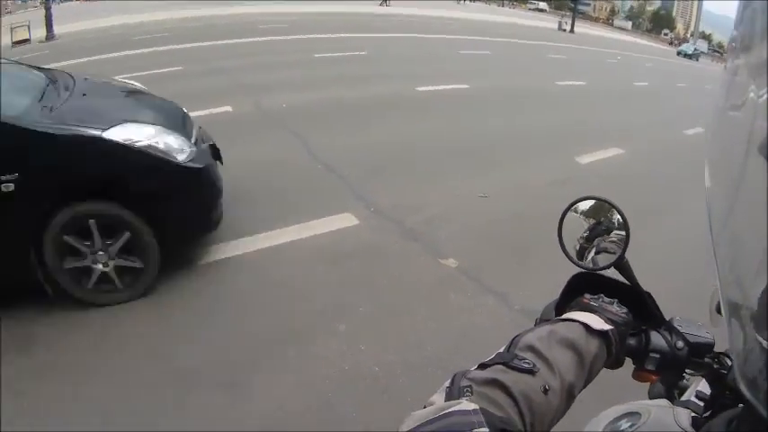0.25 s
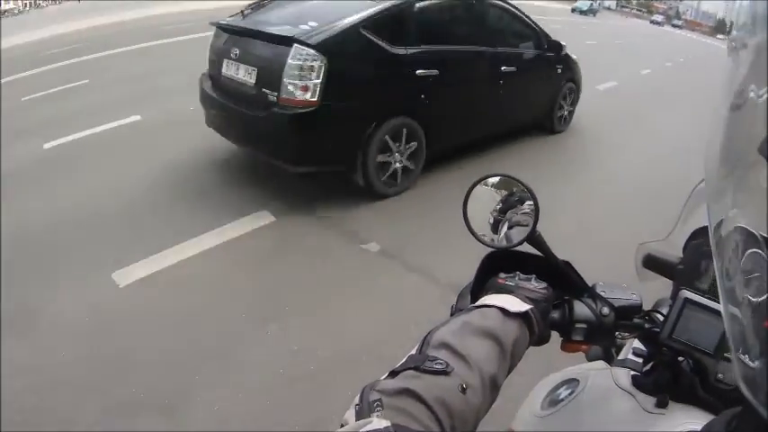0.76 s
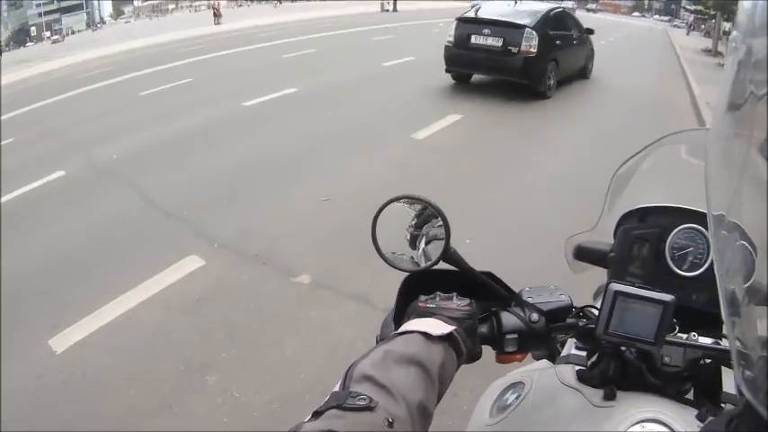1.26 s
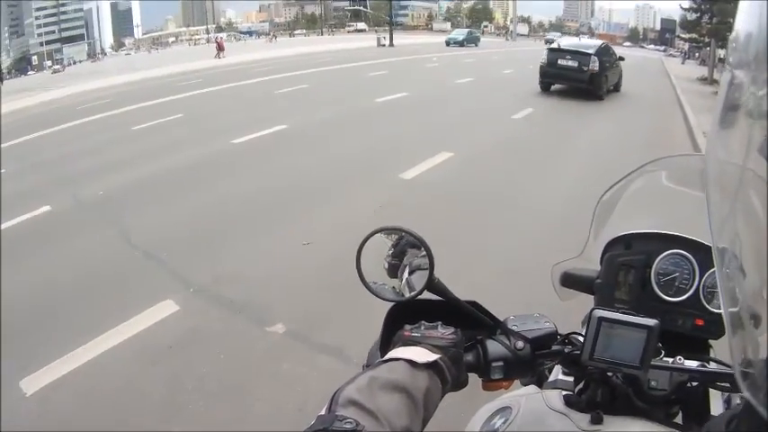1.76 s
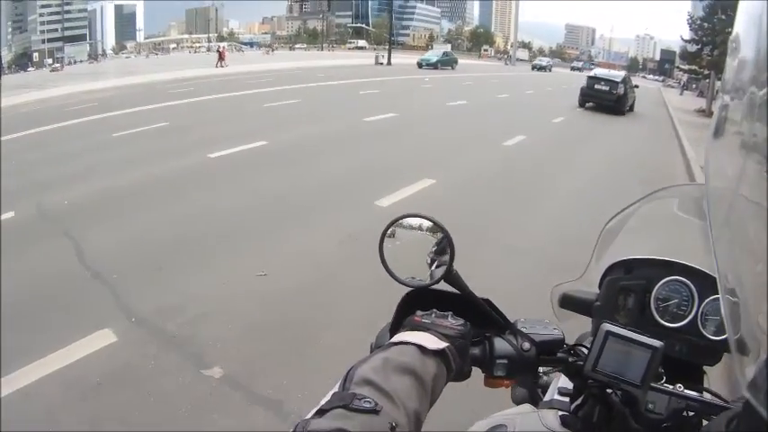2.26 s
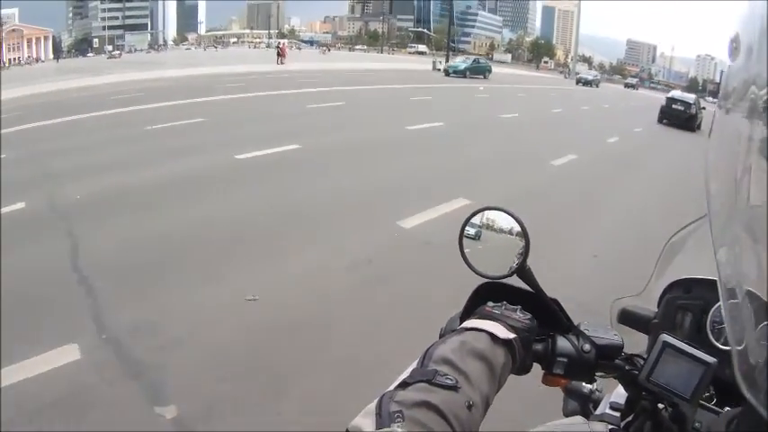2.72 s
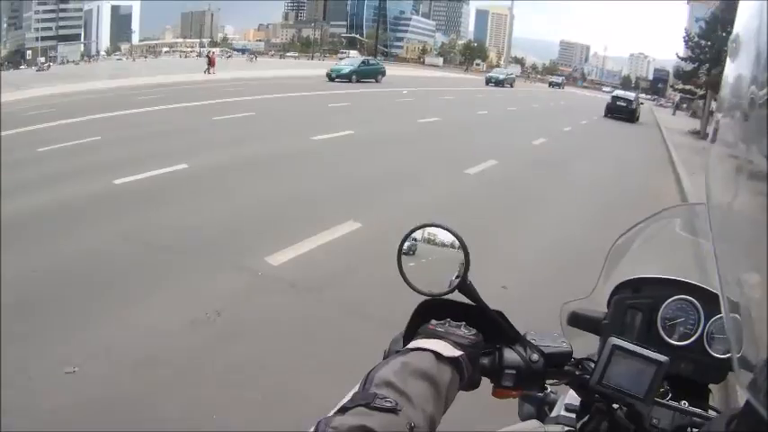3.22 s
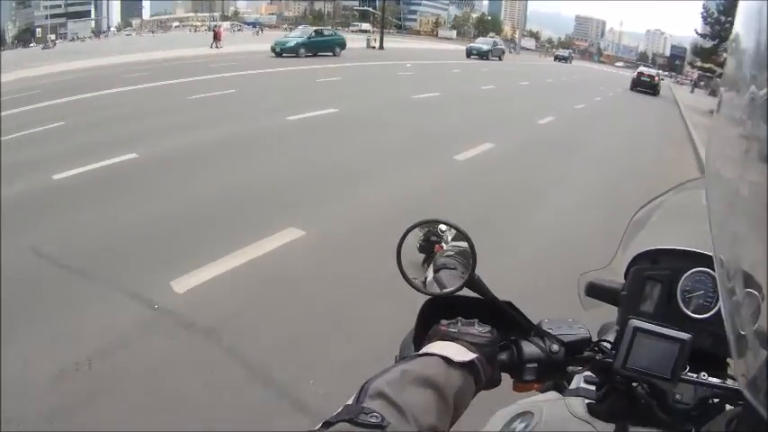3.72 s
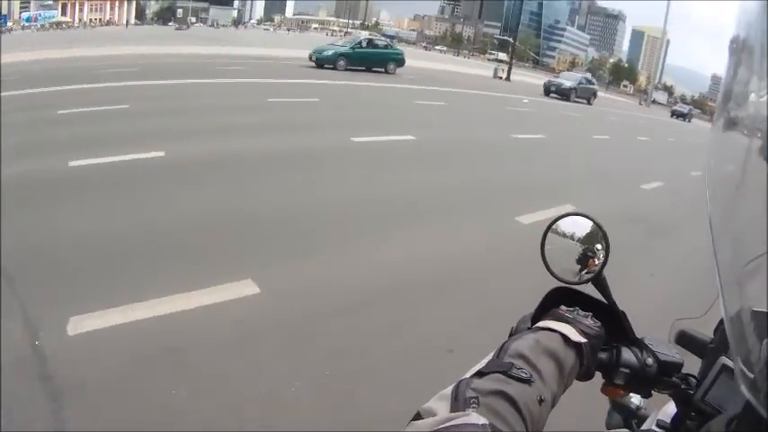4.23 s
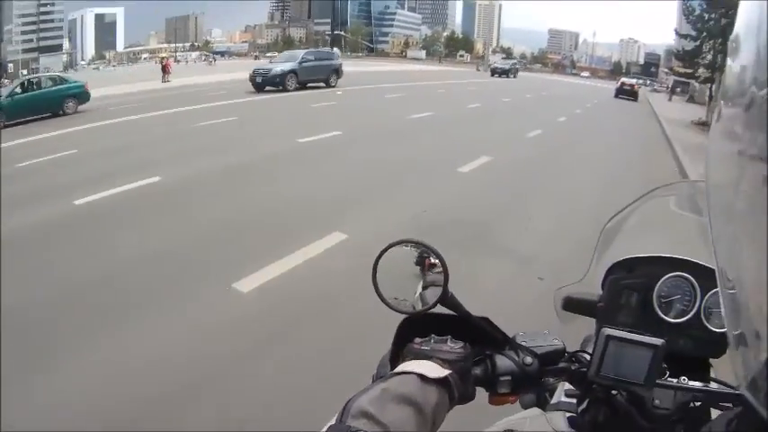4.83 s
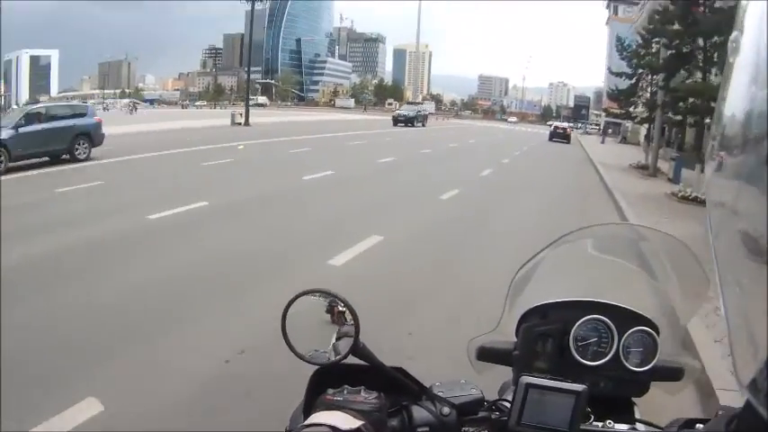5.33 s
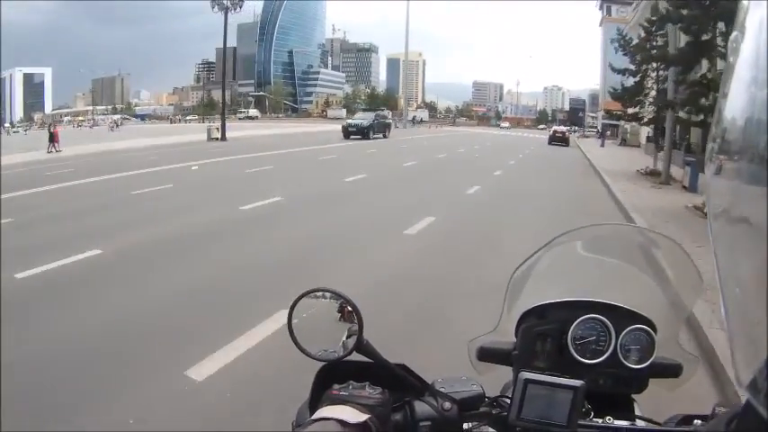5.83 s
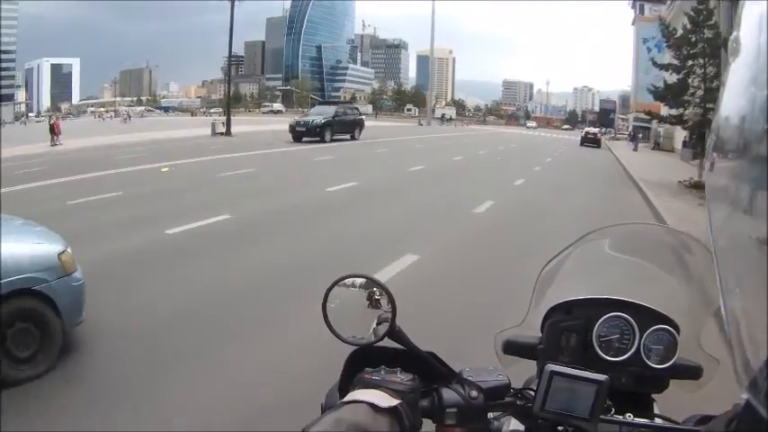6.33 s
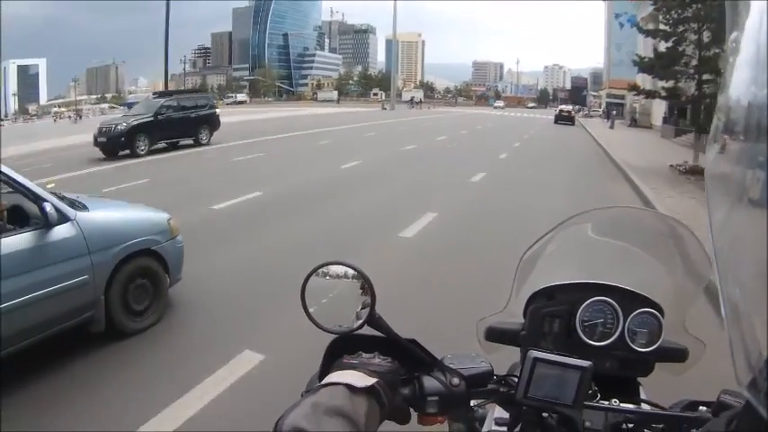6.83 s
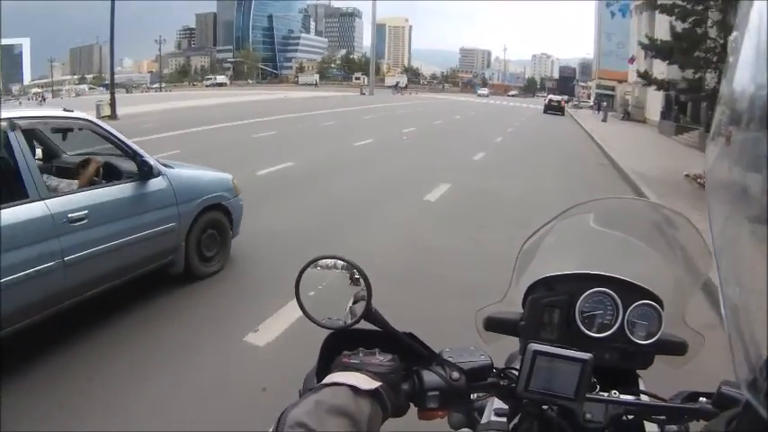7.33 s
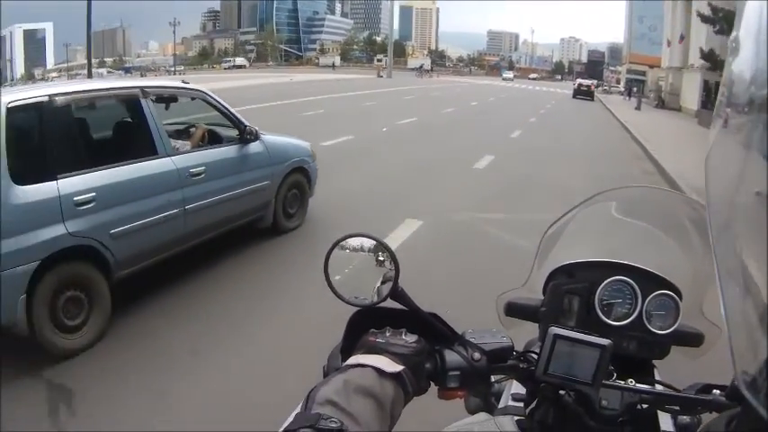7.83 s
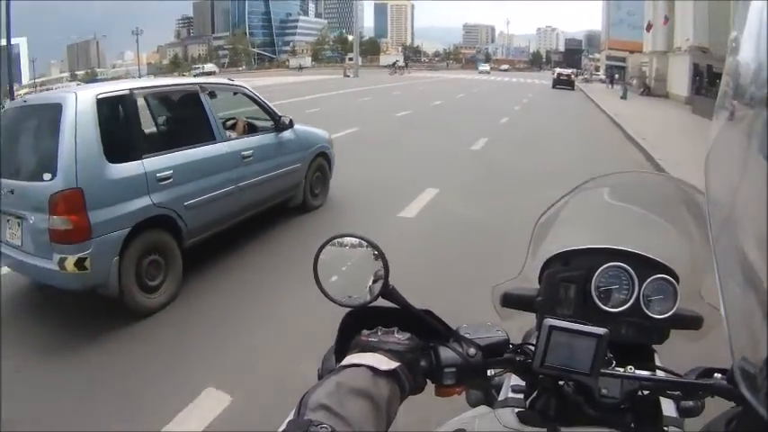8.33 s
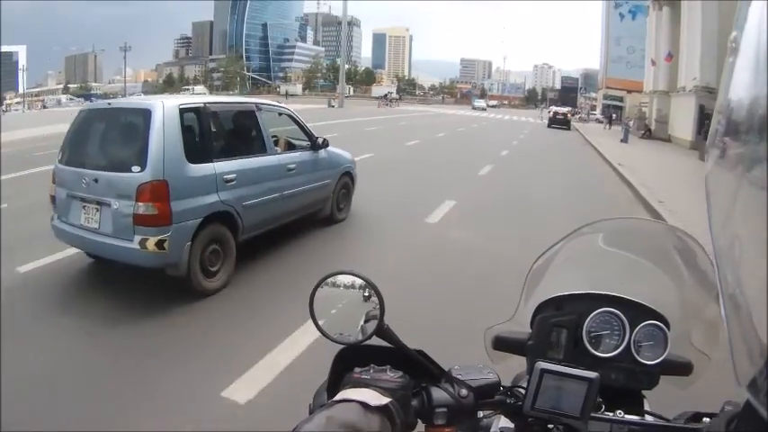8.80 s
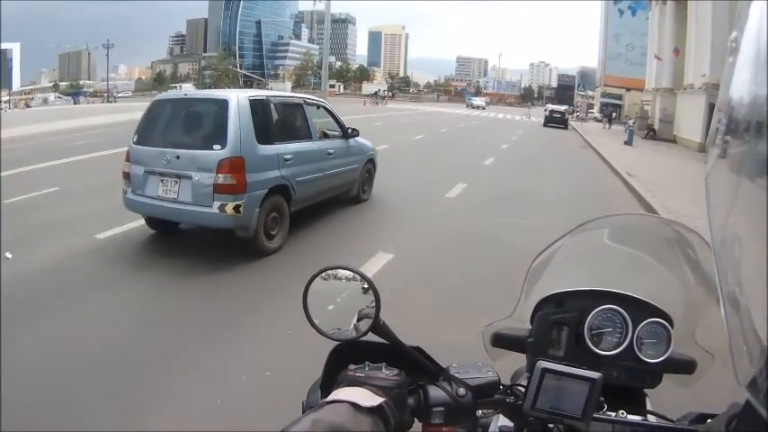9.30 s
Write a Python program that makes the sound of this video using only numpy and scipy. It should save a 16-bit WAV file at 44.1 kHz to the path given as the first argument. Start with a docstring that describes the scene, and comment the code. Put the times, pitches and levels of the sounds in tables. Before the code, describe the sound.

A single-cylinder motorcycle heard from the rider's helmet on an open city street. The low, uneven thump dips, picks up and settles to a steady chug with light mechanical ticking, while cars pass with tyre roar. It then revs up, growing throaty with intake hiss, until the throttle shuts and the engine drops back. A car hums alongside, then wind gusts batter the microphone.

```python
"""The thump of a single-cylinder four-stroke motorcycle, heard from the rider's helmet on a wide city road.
Each firing rings the exhaust pipe, the piston knocks in the crankcase and the valve gear ticks in the head.
The engine pulls up, air hissing at the intake, then the throttle shuts. Shaped noise makes the tyres, which
roar and hiss as cars go by; a car engine hums alongside late on. Wind rumbles at the microphone, and short
packets of filtered noise make its buffets, which crowd into the gusts towards the end."""
import sys
import numpy as np
from scipy import signal
from scipy.fft import rfft, irfft
from scipy.io import wavfile
from scipy.ndimage import uniform_filter1d

SR = 44100
rng = np.random.default_rng(int(sys.argv[2]) if len(sys.argv) > 2 else 0)


def int16_out(signal):
    """Quantize to a 16-bit WAV file."""
    q = np.round(np.clip(np.atleast_2d(signal).T, -1, 1) * 32767)
    wavfile.write(sys.argv[1], SR, q.astype(np.int16))


N = 421596

# engine speed, one firing per engine cycle: start_s, firing_rate_hz
FIRING_RATE = [(0.0, 17.407), (0.058, 16.089), (0.77, 23.68), (1.88, 19.956), (2.427, 19.441),
               (3.322, 20.793), (3.756, 21.894), (4.446, 19.562), (5.022, 22.048), (5.175, 21.233),
               (6.327, 26.431), (7.199, 31.146), (7.43, 31.249), (7.56, 26.5), (7.75, 23.7), (9.56, 23.2)]
# cars going by: nearest_s, fade_s (roar falls 3 dB in this time; sign ignored), roar_db, hiss_db,
# tread_air_db, tread_air_pitch_hz
PASSES = [(.1, 0.84, -64.5, -81, -72.5, 1470), (.48, -0.03, -75, -74.5, -74.5, 2090),
          (4.95, 0.73, -68.5, -86, -79, 1660), (5.38, 0.45, -62, -77.5, -69.5, 1010),
          (6.6, 0.47, -63, -86, -82, 1080), (7.45, 0.65, -65, -94, -81, 1600),
          (8.1, .5, -78, -82, -79, 1690)]


def undb(db):
    """Decibels to gain."""
    return 10 ** (np.asarray(db) / 20)


def curve(rows):
    """Rows of (s, value), joined by straight lines in time."""
    rows = np.array(rows)
    return np.interp(np.arange(N) / SR, rows[:, 0], rows[:, 1])


def swell(start, length, rise, fall):
    """Rise before the start, hold for the length and fall, between 0 and 1; times in seconds."""
    corners = [start - rise, start, start + length, start + length + fall]
    return np.interp(np.arange(N) / SR, corners, [0, 1, 1, 0])


def unit(x):
    """Scale to rms 1."""
    return x / np.sqrt(np.mean(x ** 2))


def noise():
    """White noise."""
    return rng.standard_normal(N)


def walk(rate):
    """Random levels held for 1 / rate seconds and smoothed twice; spread near 1."""
    hold = int(SR / rate)
    steps = np.repeat(noise()[:N // hold + 1], hold)
    smooth = uniform_filter1d(uniform_filter1d(steps, hold), hold)
    return 1.61 * smooth[:N]


def colour(x, points):
    """Shape a sound by a (Hz, dB) spectrum, thinned below its first frequency, at rms 1."""
    hz, db = np.transpose(points)
    f = np.maximum(np.arange(N // 2 + 1) * SR / N, 1)
    low_cut = f ** 2 / (f ** 2 + hz[0] ** 2)
    gain = undb(np.interp(np.log(f), np.log(hz), db)) * low_cut
    return unit(irfft(rfft(x) * gain, N))


def ring(x, modes):
    """Drive a set of (Hz, width Hz, dB) resonances, at rms 1."""
    total = 0
    for hz, width, db in modes:
        b, a = signal.iirpeak(hz, hz / width, SR)
        total = total + undb(db) * signal.lfilter(b, a, x)
    return unit(total)


def resonate(x, points):
    """Ring a hollow body given by its (Hz, dB) response: the sound follows the push, at rms 1."""
    hz, db = np.transpose(points)
    f = np.maximum(np.arange(8193) * SR / 16384, 1)
    cepstrum = irfft(np.log(undb(np.interp(np.log(f), np.log(hz), db))))
    # folding the cepstrum forward in time gives a minimum-phase response
    causal = 1 + np.sign(np.fft.fftfreq(len(cepstrum)))
    response = irfft(np.exp(rfft(cepstrum * causal)))
    return unit(signal.fftconvolve(x, response)[:N])


def strokes(cycles, scatter_db):
    """One impulse of uneven size each time the cycle count reaches a whole number."""
    return np.diff(np.floor(cycles), prepend=-1) * undb(scatter_db * noise())


def gate(cycles, place, width):
    """A smooth opening once a cycle; place and width are shares of the cycle."""
    from_place = (cycles - place + .5) % 1 - .5
    return np.exp(-.5 * (from_place / width) ** 2)


def exhaust(cycles):
    """Each firing pushes a slug of gas into the pipe; a bark and a rough puff follow it and shake the casing."""
    # response of silencer and pipe: frequency_hz, relative_db
    pipe = [(20, -42.5), (40, -3), (58, -6.5), (80, 2), (95, 5), (107, 10.5), (124, 3), (142, -5.5),
            (175, -17), (245, -10), (310, -31), (430, -32), (560, -36.5), (3000, -81.5)]
    # tones the pipe sings at high revs: multiple_of_firing_rate, relative_db
    load_tones = [(8, -13), (9, -17.5), (14, -27), (23, -24), (24, -23.5), (26, -28)]
    # sharp edge of each exhaust stroke: frequency_hz, relative_db
    bark_response = [(120, -35), (180, -19), (225, -6), (265, 1), (320, -13.5), (390, -3), (460, -1),
                     (540, -12.5), (900, -24), (2500, -53)]
    # colour of the rough puff of gas: frequency_hz, relative_db
    puff_colour = [(150, 11.5), (260, 0.5), (450, -5), (700, -19.5), (1400, -34), (3000, -42)]
    # ringing of engine casing and fairing: frequency_hz, width_hz, relative_db
    casing = [(250.5, 26, 3.5), (432, 11, 1.5), (1014, 12, -12)]
    # throttle eased open, held, opened wide, shut: start_s, opening (0-1)
    throttle = [(0, 0.08), (.45, 0.56), (5.3, 0.65), (6.1, 0.72), (7.41, 0.81), (7.56, 0.2), (7.85, 0)]
    push_lead_s = .0043  # the push starts this early, so the thump lands on the beat after the chambers' delay
    chamber_hz, chamber_q = 120, .3
    shut_db, open_gain_db = -62, 16  # base level with the throttle shut, and what full throttle adds

    firing_hz = curve(FIRING_RATE)
    early_cycles = cycles + push_lead_s * firing_hz
    firing = strokes(early_cycles + .005 * walk(25), scatter_db=.6)
    # the piston's other down-stroke draws air: a weak pulse half a cycle later
    suction = strokes(early_cycles + .5, scatter_db=3)
    # the silencer's chambers hold back the bass of each push
    _, chambers = signal.iirpeak(chamber_hz, chamber_q, SR)
    push = signal.lfilter(chambers[::-1], chambers, -firing - undb(-22.5) * suction)

    # at higher revs the gas is hotter, so the pipe rings higher
    heat = np.interp(firing_hz, [22, 30], [0, 1])
    hot_pipe = [(1.064 * hz, db) for hz, db in pipe]
    thump = (1 - heat) * resonate(push, pipe) + heat * resonate(push, hot_pipe)

    tones = 0
    for multiple, db in load_tones:
        tones = tones + undb(db + 2 * walk(9.9)) * np.sin(2 * np.pi * multiple * early_cycles)
    tones = heat * tones

    bark = resonate(-strokes(cycles - .165 + .003 * walk(25), scatter_db=2.5), bark_response)
    burn = undb(1.8 * walk(25))
    puff = colour(noise() * burn * gate(cycles, place=.16, width=.049), puff_colour)
    shake = noise() * (.15 + gate(cycles, place=.1, width=.1))
    rough = undb(-21) * bark + undb(-17) * puff + undb(-23.5) * ring(shake, casing)
    # the rough part gains up to 6.5 dB with heat
    mix = undb(3.5) * thump + undb(3.0) * tones + undb(6.5 * heat) * rough
    return mix * undb(shut_db + open_gain_db * curve(throttle))


def piston_knock(cycles):
    """Combustion slaps the piston on the bore once a cycle: a knock and short rattle ring the crankcase."""
    # ringing of the crankcase: frequency_hz, width_hz, relative_db
    crankcase = [(560, 28, 0), (673, 16.6, 12.5), (718, 16, -1.5), (827, 26, -11), (1055, 20, -13),
                 (1360, 57, -20), (1560, 124, -12.5)]
    # level of the knock: start_s, level_db
    knock_level = [(0, -80), (1.8, -77), (2.05, -70.5), (4.0, -71.5), (4.4, -77), (6.0, -73), (6.5, -68.5),
                   (7.6, -68.5), (7.8, -78)]
    knock = strokes(cycles - .06 + .002 * walk(25), scatter_db=2)
    rattle = noise() * gate(cycles, place=.1, width=.075)
    both = ring(knock, crankcase) + undb(-6) * ring(rattle, crankcase)
    return unit(both) * undb(curve(knock_level))


def valve_gear(cycles):
    """Valves open and seat at fixed places in the cycle, ringing the finned head."""
    # knocks in one engine cycle: place (0-1 of the cycle), relative_db
    valves = [(0.0, 4), (.18, 2.5), (.62, 1.5), (.8, -0.5)]
    # ringing of the cylinder head: frequency_hz, width_hz, relative_db
    head = [(4715, 35, 5), (5000, 68, -5), (6300, 140, -7), (7010, 120, -3), (8270, 86, -6.5),
            (9130, 29, 2), (10060, 83, -6)]
    # colour of the clatter: frequency_hz, relative_db
    clatter_colour = [(1500, -3), (4000, 2.5), (7000, -4), (11000, 1), (15000, -2)]
    # base level of the clatter: start_s, level_db
    clatter_level = [(0, -83), (1.0, -82.5), (1.4, -79), (2.4, -85), (3.0, -86.5), (3.7, -79), (4.0, -80),
                     (4.2, -88), (7.4, -81), (8.4, -87)]
    knocks = sum(undb(db) * gate(cycles, place, width=.028) for place, db in valves)
    # every second cycle clatters a little harder
    alternation_db = 1.2 * np.cos(np.pi * cycles)
    rattle = noise() * knocks * undb(1.2 * walk(60) + 1.0 * walk(12) + alternation_db)
    mix = undb(-7) * colour(rattle, clatter_colour) + undb(-6.0) * ring(rattle, head)
    return mix * undb(curve(clatter_level))


def brake():
    """The last moment of a faint brake squeal: wavering tones of the disc."""
    # tones of the disc: frequency_hz, level_db
    disc_tones = [(3478, -80), (4823, -83)]
    t = np.arange(N) / SR
    squeal = 0
    for hz, db in disc_tones:
        squeal = squeal + undb(db) * np.sin(2 * np.pi * hz * t + .52 * walk(60))
    return squeal * swell(0, .061, rise=.01, fall=.026)


def tyre_levels():
    """Gains of roar and hiss: the bike's own tyres plus each car, which swells as it comes near."""
    own_roar_db, own_hiss_db = -69.5, -79.5
    hiss_lag_s, hiss_fall = .061, 1.36  # tread hiss is thrown backwards and dies away faster than the roar
    t = np.arange(N) / SR
    roar_power, hiss_power = undb(own_roar_db) ** 2, undb(own_hiss_db) ** 2
    for nearest, fade_s, roar_db, hiss_db, _, _ in PASSES:
        roar_distance = np.hypot(1, (t - nearest) / fade_s)
        hiss_distance = np.hypot(1, (t - nearest - hiss_lag_s) / fade_s)
        roar_power = roar_power + (undb(roar_db) / roar_distance) ** 2
        hiss_power = hiss_power + (undb(hiss_db) / hiss_distance ** hiss_fall) ** 2
    return np.sqrt(roar_power), np.sqrt(hiss_power)


def road():
    """Tread roar and finer hiss, both noise that differs only a little between the ears."""
    # colour of the tread roar: frequency_hz, relative_db (per Hz)
    roar_colour = [(25, 0), (60, -15), (170, -19), (300, 2.5), (500, 6), (700, 2), (1000, 2.5), (1650, -5),
                   (2100, -13.5), (3200, -24), (5000, -38.5)]
    # colour of the tread hiss: frequency_hz, relative_db (per Hz)
    hiss_colour = [(1000, 6.5), (2500, 5.5), (3600, 4.5), (4300, 1.5), (5500, 0), (6500, 0), (8000, -3.5),
                   (12000, -6.5), (15000, -24.5)]
    roar_gain, hiss_gain = tyre_levels()
    roar = colour(noise(), roar_colour) * roar_gain * undb(.65 * walk(17))
    hiss = colour(noise(), hiss_colour) * hiss_gain * undb(.35 * walk(14.0))
    side_hiss = colour(noise(), hiss_colour) * hiss_gain * undb(-8.5)
    side_roar = undb(-89) * colour(noise(), roar_colour)
    # the side signal has opposite signs left and right
    return roar + hiss + (side_hiss + side_roar) * np.array([[1], [-1]])


def tread_air():
    """Air pumped from the tyre grooves brightens each car at its nearest; every tread has its own pitch."""
    width_share = .44  # width of each resonance, as a share of its pitch
    t = np.arange(N) / SR
    out = 0
    for nearest, fade_s, _, _, db, hz in PASSES:
        groove = [(hz, width_share * hz, 0)]
        nearness = 1 / (1 + ((t - nearest) / fade_s) ** 2)
        out = out + ring(ring(noise(), groove), groove) * undb(db) * nearness
    return out


def wind_level():
    """Nominal wind at the microphone in dB: the breeze, joined by the strongest gust that is blowing."""
    # gusts: start_s, length_s, level_db
    gust_rows = [(0.143, 0.96, -66), (1.043, 0.095, -57), (2.052, 0.049, -64.5), (7.99, 0.022, -61.5),
                 (8.092, 0.19, -59.5), (8.463, 0.15, -59), (8.73, 0.28, -57), (9.054, 0.28, -56),
                 (9.26, 0.15, -53.5), (9.473, 0.099, -52)]
    breeze_db = -68.5  # steady airflow over the helmet
    rise_s, fall_s = .043, .034
    gusts = [undb(db) * swell(start, length, rise_s, fall_s) for start, length, db in gust_rows]
    return 20 * np.log10(np.hypot(undb(breeze_db), np.max(gusts, axis=0)))


def wind():
    """Eddies break on the microphone: a lumpy rumble that brightens as the gust grows."""
    # colour of the rumble: frequency_hz, relative_db (per Hz)
    rumble_colour = [(25, 3), (60, 2), (95, 8), (165, 1), (230, 2), (380, -6), (600, -15), (1000, -22.5),
                     (1600, -53), (5000, -54)]
    # colour of the fine flutter: frequency_hz, relative_db (per Hz)
    flutter_colour = [(150, 5), (340, 3.5), (550, 4), (1000, -25), (1600, -37), (2500, -50), (5000, -72)]
    gust_db = wind_level()
    lumps = undb(2.4 * walk(170) + 1.1 * walk(35))
    # flutter gains on the rumble in stronger wind
    flutter = undb(.32 * (gust_db + 31.5)) * colour(noise() * lumps, flutter_colour)
    rumble = undb(4.5 - .14 * (gust_db + 46.0)) * colour(noise() * lumps, rumble_colour)
    return (rumble + flutter) * undb(gust_db)


def small_buffets():
    """Vortices at random times, as strong as the wind is then: rows of start, peak, pitch, length."""
    rate_per_s = 65
    above_wind_db, scatter_db = 9, 1  # peak above the wind's level, and its spread either way
    centre_hz, length_s = 418, .00552
    wind_db = wind_level()
    rows = []
    for when, size, pitch in rng.random((int(rate_per_s * N / SR), 3)):
        peak_db = wind_db[int(when * N)] + above_wind_db + scatter_db * (2 * size - 1)
        # pitches spread over one octave
        rows.append((when * N / SR, peak_db, centre_hz * 2 ** (pitch - .5), length_s))
    return rows


def buffets():
    """A vortex hits the microphone: one sharp pressure swing inside a packet of turbulence."""
    # buffets at set times, strong and weak: start_s, peak_db, pitch_hz (upper edge of the band), length_s
    timed_buffets = [(0.151, -46.5, 260, 0.039), (1.048, -43, 298, 0.02), (1.076, -44, 400, 0.02),
                     (1.12, -39.5, 730, 0.014), (1.132, -40, 560, 0.0063), (5.246, -45, 262, 0.035),
                     (7.992, -46.5, 477, 0.011), (8.146, -42, 470, 0.0063), (8.154, -40.5, 480, 0.018),
                     (8.245, -41, 346, 0.015), (8.279, -45, 258, 0.016), (8.763, -35, 333, 0.005),
                     (8.776, -44, 594, 0.0043), (8.801, -36, 380, 0.0063), (8.804, -38, 620, 0.0095),
                     (8.832, -28.5, 517, 0.0028), (8.877, -33.5, 470, 0.0095), (8.889, -36.5, 480, 0.023),
                     (8.911, -36, 694, 0.0058), (8.941, -31, 515, .004), (8.946, -30.5, 1330, 0.0012),
                     (8.947, -29, 332, 0.0056), (8.972, -40.5, 557, 0.003), (9, -34.5, 427, 0.0057),
                     (9.031, -38.5, 636, 0.0025), (9.036, -35, 635, 0.0039), (9.052, -52, 600, 0.0033),
                     (9.085, -32, 610, 0.0044), (9.097, -37, 466, 0.0081), (9.121, -42, 440, 0.003),
                     (9.15, -51, 560, 0.0025), (9.164, -45, 760, 0.005), (9.219, -45, 700, 0.0078),
                     (9.249, -35, 590, 0.002), (9.254, -35.5, 554, 0.013), (9.264, -38.5, 850, 0.0053),
                     (9.298, -38.5, 515, 0.0062), (9.324, -41, 760, 0.0093), (9.344, -32, 524, 0.011),
                     (9.354, -34, 597, 0.0059), (9.385, -31, 474, 0.0029), (9.398, -30, 480, 0.0019),
                     (9.413, -30.5, 383, 0.0081), (9.449, -44, 480, 0.0035), (9.473, -41, 455, 0.005),
                     (9.492, -40, 600, 0.003), (9.507, -34.5, 380, 0.0076), (9.521, -33.5, 630, 0.0056),
                     (9.548, -33.5, 380, 0.014)]
    wake_db, wake_s = -37.5, .017  # turbulence trailing each buffet before filtering, and its decay time
    finest_ratio, finest_hz = 2.4, 2100  # fine eddies roll off above this multiple of pitch, or this limit
    out = np.zeros(N + SR)
    age = np.arange(SR // 8) / SR
    for start, db, hz, length_s in [*timed_buffets, *small_buffets()]:
        rise = age / (.3 * length_s)
        wake = undb(wake_db) * np.minimum(rise, 1) * np.exp(-age / wake_s)
        packet = rise ** 2 * np.exp(-2 * rise)
        swirl = rng.standard_normal(len(age)) * (packet + wake)
        # the core of the vortex, which outweighs the turbulence in a short buffet
        swirl[np.searchsorted(rise, 1)] += 1.4
        band = signal.butter(2, [.28 * hz, hz], "band", fs=SR, output="sos")
        swirl = signal.sosfilt(band, swirl)
        # a broad vortex holds few fine eddies
        fine_cut = signal.butter(4, min(finest_ratio * hz, finest_hz), fs=SR, output="sos")
        swirl = signal.sosfilt(fine_cut, swirl)
        first = int(start * SR)
        out[first:first + len(age)] += undb(db) * swirl / np.abs(swirl).max()
    return out[:N]


def intake():
    """Air hisses past the throttle, growing as the engine revs up."""
    # colour of the hiss: frequency_hz, relative_db
    air_colour = [(2000, 12), (4500, 6.5), (6500, 9), (9000, 1.5), (11500, -1), (15000, 3)]
    from_hz, rise_hz = 22.5, 4.8  # the hiss starts at this firing rate and is full that much higher
    flow = np.clip((curve(FIRING_RATE) - from_hz) / rise_hz, 0, 1)
    return colour(noise(), air_colour) * flow * undb(-73.5)


def scrapes():
    """Loose fittings on the bike scrape briefly: short bursts of noise through their resonances."""
    # short soft scrapes: start_s, level_db
    scrape_rows = [(3.381, -68.5), (3.901, -77)]
    bursts = sum(undb(db) * swell(start, .003, rise=.003, fall=.014) for start, db in scrape_rows)
    fitting = [(2900, 760, 6), (4200, 700, -1), (5570, 700, 0)]  # frequency_hz, width_hz, relative_db
    return bursts * ring(ring(noise(), fitting), fitting)


def passing_car():
    """The hum of a car engine close by, two harmonics of its turning, with a soft whirr of noise on top."""
    # engine of the car alongside: start_s, length_s, level_db
    car_row = (7.68, 0.23, -64)
    fade_s = .47
    turn = 2 * np.pi * 30.0 * np.arange(N) / SR + .13 * walk(1.2)  # 30 turns a second, drifting slightly
    hum = np.sin(2 * turn) + undb(-20) * np.sin(3 * turn)
    whirr = ring(noise(), [(3170, 450, 1), (3500, 220, -10)]) * undb(2 * walk(25))
    start, length, db = car_row
    return (hum + undb(-15.5) * whirr) * undb(db) * swell(start, length, fade_s, fade_s)


def scene():
    """Engine, road, neighbouring car and wind, all close to the helmet."""
    cycles = np.cumsum(curve(FIRING_RATE)) / SR
    engine = exhaust(cycles) + piston_knock(cycles) + valve_gear(cycles) + intake()
    bike = engine + brake() + scrapes()
    traffic = road() + tread_air() + passing_car()
    return bike + traffic + wind() + buffets()


def record(dry):
    """The camera cuts the top: a steep low-pass at 15250 Hz."""
    low_pass = signal.ellip(10, .2, 70, 15250, fs=SR, output="sos")
    return signal.sosfilt(low_pass, dry)


dry = scene()
out = record(dry)
int16_out(out)
```